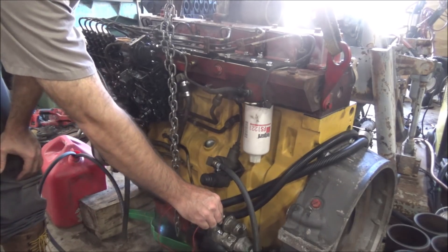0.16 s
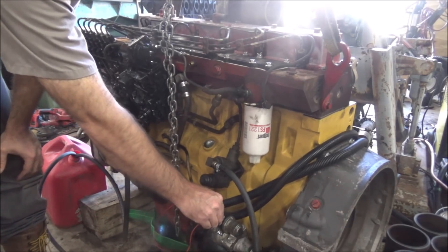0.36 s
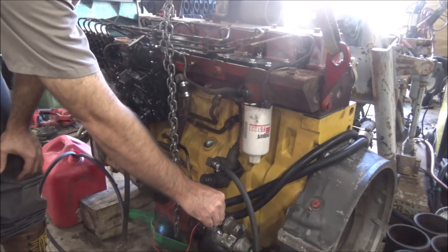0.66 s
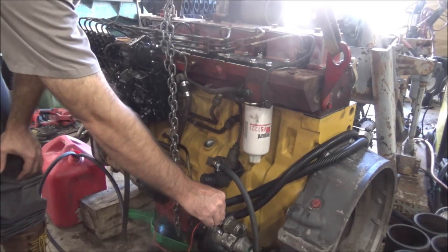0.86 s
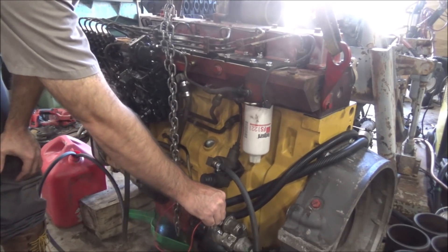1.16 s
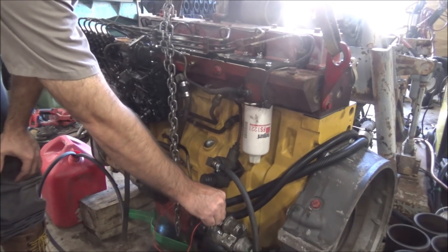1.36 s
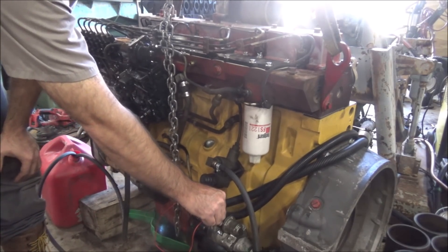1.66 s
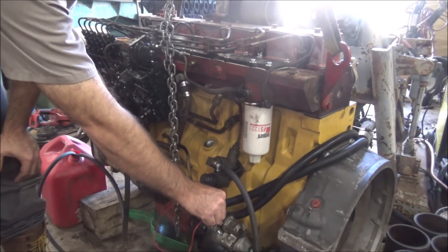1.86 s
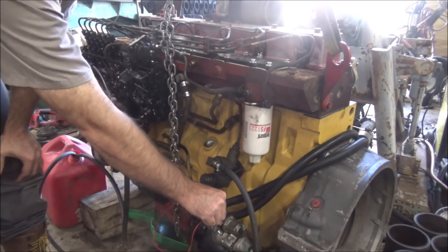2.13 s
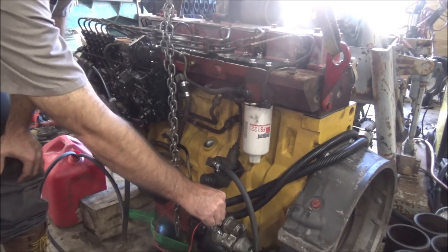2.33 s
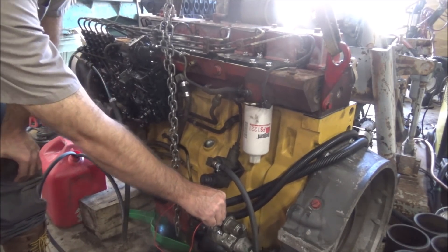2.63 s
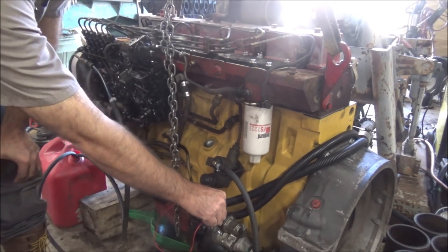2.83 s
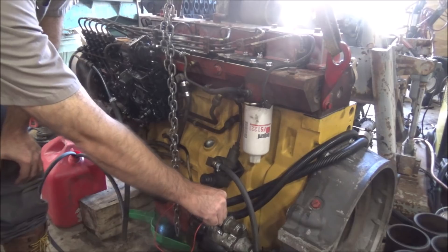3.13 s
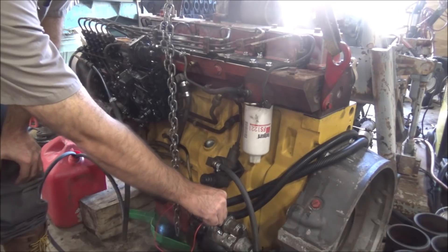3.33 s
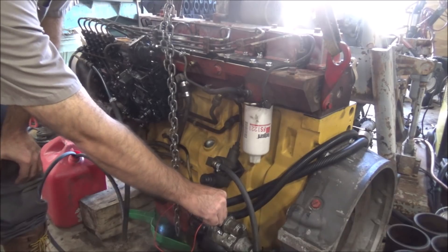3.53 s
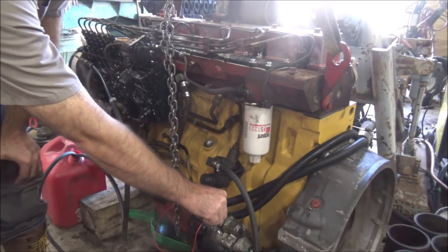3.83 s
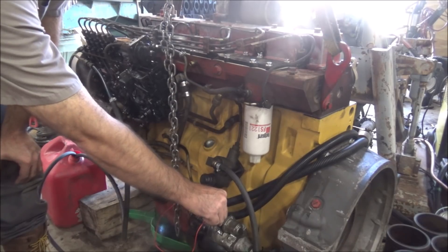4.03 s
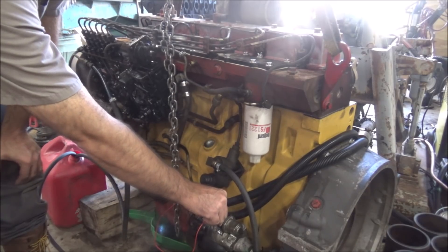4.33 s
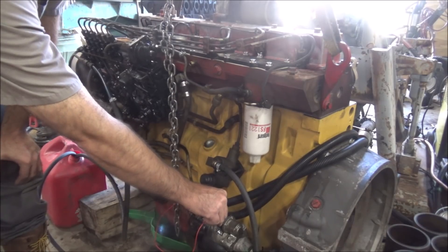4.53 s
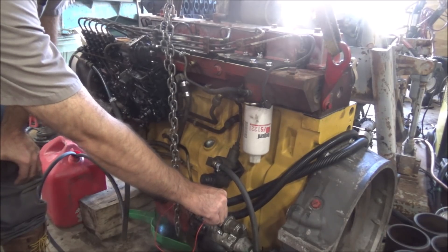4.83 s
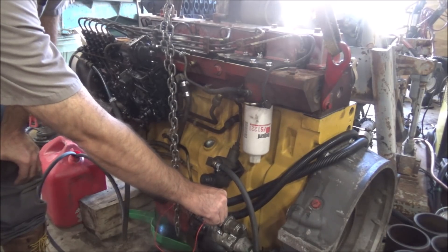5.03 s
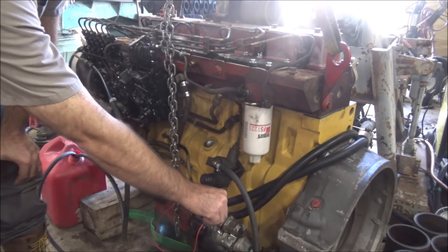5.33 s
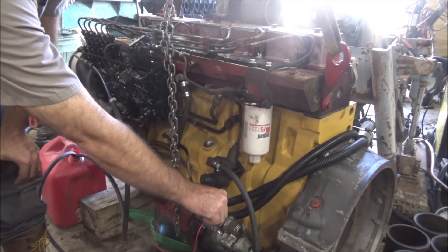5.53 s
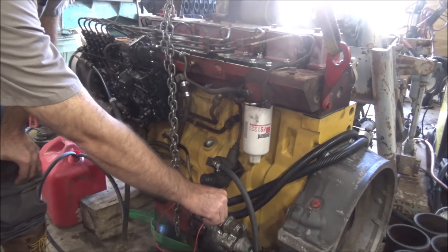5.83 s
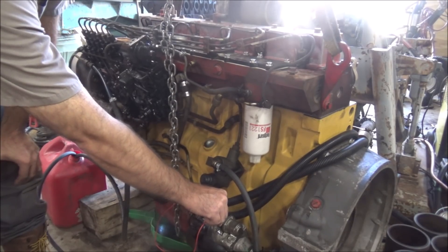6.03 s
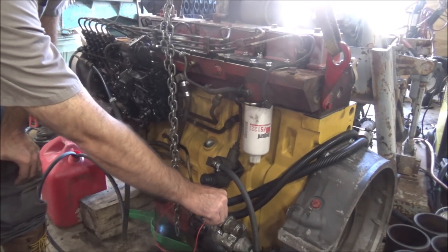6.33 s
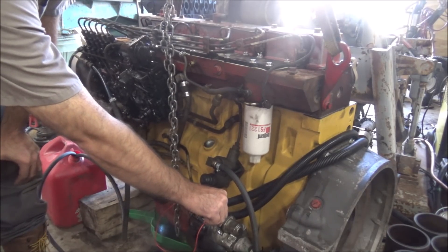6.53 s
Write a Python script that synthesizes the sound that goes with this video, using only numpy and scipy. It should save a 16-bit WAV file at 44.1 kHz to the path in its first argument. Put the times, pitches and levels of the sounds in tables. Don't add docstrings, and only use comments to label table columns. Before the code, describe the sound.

Close by in a reverberant metal-filled workshop, an electric starter engages with a snap and toothy clank, then drags a six-cylinder diesel around. The first strokes stumble, groaning and squeaking; afterwards rapid, regular double clacks and airy chuffs continue to the end. Gear grind and narrow ringing tones swell and slacken with every compression, while loose parts knock. The sound is nearly mono, and the engine does not start.

```python
import sys
import numpy as np
from scipy import signal
from scipy.fft import rfft, irfft, next_fast_len
from scipy.io import wavfile
from scipy.ndimage import uniform_filter1d, map_coordinates

SR = 44100
rng = np.random.default_rng(int(sys.argv[2]) if len(sys.argv) > 2 else 0)


def invert_db(x):
    u = np.asarray(x, float) / 20
    return 10 ** u


def master_out(mix):
    frames = np.transpose(np.atleast_2d(mix))
    ceiling = np.clip(frames, -1, 1)
    pcm = np.round(ceiling * 32767).astype(np.int16)
    wavfile.write(sys.argv[1], SR, pcm)


N = 294588
T = np.arange(N) / SR

# pitch_hz, level_db
HUM = [(116, -34.5), (232, -40), (352, -45), (545, -59), (950, -53)]
# freq_hz, density_db
SHOP_NOISE = [(150, -10), (400, -13), (1000, -8), (2000, -13), (5000, -20), (15000, -25)]
# time_s, gain_db
DUCK = [
    (0, -9.5),
    (.034, -8),
    (.036, -24),
    (.065, -16),
    (.1, -21.5),
    (.5, -31),
    (6.68, -39),
]
# time_s, half_length_s, level_db
LURCH = [
    (0.043, 0.049, -50),
    (0.247, 0.067, -55),
    (0.51, 0.1, -50),
    (1.2, .05, -52),
]
# freq_hz, t60_s
ROOM = [(200, 0.76), (2000, 0.98), (10000, 0.33)]

# time_s, pitch_hz, level_db, octave_db
GROAN = [
    (.315, 345, -42, -33),
    (.345, 342, -35, -25),
    (.37, 300, -35, -28),
    (.4, 262, -40, -29),
    (.435, 262, -39, -30),
    (.45, 270, -38, -39),
    (.49, 278, -46, -46),
]
# time_s, half_length_s, level_db
SQUEAKS = [(0.306, 0.028, -32), (0.347, .012, -38), (0.453, .025, -31.5), (0.567, 0.037, -31.5),
           (0.682, 0.034, -41), (0.767, .02, -39)]
# freq_hz, width_hz, level_db
SEAL = [(7780, 340, 5), (8600, 730, 7.5), (11150, 610, 3.5), (11630, 240, -3)]

# upper_hz, lower_hz
PIPE_HZ = (113.2, 99.4)
# upper_db, lower_db
PIPE = [(-52, -68), (-52, -64), (-52.5, -66), (-52.5, -55), (-54.5, -61), (-52.5, -53.5)]
CASTING_HZ = [751, 839, 1054, 1172, 1469, 1884, 2073, 2730, 2897]
KNOCKS_PER_STROKE, KNOCK_DB, KNOCK_CYCLES, KNOCK_DELAY_S = 7, -33, 15.6, .035

# time_s, snap_db, decay_s, body_db
BLOWS = [
    (0.0646, -18, 0.004, -40),
    (0.075, -23, 0.015, -23.5),
    (0.123, -19.5, 0.0037, -29),
]
# freq_hz, density_db
SNAP = [(500, -22), (1500, -12), (3000, -1), (6500, 6.5), (10000, 8), (15800, -10)]
# pitch_hz, level_db, start_s, end_s
FREE_RING = [(1570, -19.5, .086, .129), (3950, -27, .094, .121), (5300, -35, .085, .115),
             (6800, -40, .09, .112), (7900, -41, .085, .118), (10100, -40, .09, .112),
             (2650, -34, .09, .125), (2720, -35, .255, .29), (2755, -30, .315, .35)]

CYCLE_S = [0.8226, 1.4627, 2.1092, 2.7674, 3.4316, 4.1015, 4.7714, 5.443, 6.119, 6.796]
FIRING = [0, .17, .331, .498, .666, .823]
# time_s, clack_peak_db, second_clack_db, chuff_db, chuff_s
EARLY = [(0.1314, -11.5, 0, -26.5, 0.048), (0.175, -19, -2, -27, 0.098), (0.3585, -16, -5, -25.5, 0.077),
         (0.482, -13, 0, -25, .11), (0.6204, -16, -7, -22.5, 0.038), (0.7146, -11.5, -7, -30, .1)]
# clack_peak_db, second_clack_db, chuff_db, chuff_s, brightness_db
CYLINDERS = [(-13.5, -3.5, -26, .08, 1), (-13.5, -14, -24, 0.045, 0.5), (-14, -2, -24, 0.072, 0.5),
             (-14, -9, -25, 0.066, 3), (-14.5, -4.5, -25.5, 0.051, 2), (-15, -1, -25, 0.084, 1)]
# clack_db, second_clack_db, chuff_db, brightness_db
SCATTER_DB = (1.1, 1.7, .8, 0.84)
# freq_hz, density_db
CHUFF = [(35, -54), (60, -32), (190, -20), (330, -10.5), (490, -15), (760, -5.5), (1050, -10.5),
         (1280, -15), (1550, 0), (2270, -19.5), (2800, -8.5), (4700, -17.5), (11000, -19.5), (15700, -35.5)]
# freq_hz, density_db
CLACK = [(500, -27.5), (1500, -0.5), (3000, 10.5), (6000, 0.5), (10000, -4), (13000, -8.5), (15800, -13)]
# freq_hz, width_hz, level_db
BLOCK = [(108, 27, 4), (325, 22, 6.5), (402, 58, 4.5), (570, 18, 7.5), (742, 10.6, 4.5),
         (821.4, 29.5, 12.5), (1062, 88, 11), (1410, 17, 5), (1920, 86, 8.5), (2030, 44, -2),
         (2290, 18, -20), (2855, 170, 0)]
# freq_hz, width_hz, level_db
ROCKING = [(102, 8, 1), (62, 15, -21), (45, 15, -4)]

# time_s, effort_db, ring_drive_db
STARTER = [(.07, -41, 0), (.12, -28, -5), (.18, -27, -14), (.25, -23.5, -8), (.4, -27.5, -2),
           (.69, -26, 0.5), (.97, -26, -2), (1.3, -26, 3), (1.55, -27, 1), (1.9, -27, -1), (2.7, -27.5, 2),
           (3.2, -27.5, -2.5), (3.65, -26.5, 1), (4.3, -27, -2), (5, -26.5, -3), (5.8, -28.5, -5),
           (6.1, -27.5, -2.5), (6.68, -26, 1)]
# freq_hz, density_db
GRIND = [(35, -59.5), (60, -23), (190, -19), (330, -9), (640, -4), (900, -2.5), (1280, -11.5), (1600, -3),
         (2300, -10), (2800, -10), (3570, -23), (6000, -19.5), (9000, -64.5)]
# freq_hz, density_db
HISS = [(2350, -24.5), (4000, 0), (4670, -10), (6660, -6.5), (8610, -6), (9600, -9), (11100, -4.5),
        (14900, -12), (15700, -21)]
# freq_hz, width_hz, level_db
CASE = [(393, 40, 3), (543, 19, 4), (715, 36, 1.5), (1461, 28, -3.5), (1899, 36, 0), (2079, 35, 2.5),
        (2375, 18, 6.5), (2740, 78, 3.5)]
# pitch_hz, unsteadiness_hz, level_db
RING = [(1561, 15, 0), (1541, 14, -11)]
# pitch_hz, unsteadiness_hz, level_db
HIGH_RING = [(3918, 24, -1.5), (3956, 22, -2.5), (3856, 26, -6), (2604, 18, -1.5), (2627, 16, -3.5),
             (4095, 90, -9)]
# ring_db, high_ring_db, lower_housing_db, upper_housing_db
SINGS = [(-34.5, -44, -35.5, -36.5), (-29.5, -45, -35, -36), (-32.5, -43.5, -33, -42.5),
         (-32.5, -42, -33, -32), (-31, -45, -33.5, -36.5), (-30, -44.5, -35, -31)]
# ring_db, high_ring_db, lower_housing_db, upper_housing_db
FLICKER_DB = (2.9, 3.1, 1.1, 2.6)
HISS_DB, SPIN_UP_DB, SPIN_UP_S = -10, 3.5, 1

# freq_hz, side_db
APART = [(30, -20), (100, -26), (400, -59), (1500, -48), (4000, -30), (9000, -20), (12000, -33)]
# freq_hz, side_over_mid_db
LEAN = [(60, -23.5), (400, -20), (800, -19.5), (1500, -20), (3000, -16), (6000, -19), (12000, -23.5)]
# freq_hz, side_over_mid_db
SIDE_FLOOR = [(60, -23.5), (400, -12.5), (800, -12.5), (1500, -11.5), (3000, -12), (6000, -14),
              (12000, -16.5)]
TOP_HZ = 15830


def unit(x):
    return x / np.sqrt(np.mean(x ** 2) + 1e-20)


def along(points, hz):
    f, v = np.transpose(points)
    return np.interp(np.log(hz + 1), np.log(f + 1), v)


def curves(rows, **ends):
    s, *cols = np.transpose(rows)
    return [np.interp(T, s, c, **ends) for c in cols]


def wobble(rate_hz):
    return map_coordinates(rng.standard_normal(int(N * rate_hz / SR) + 4), [T * rate_hz])


def swells(rows):
    return sum(invert_db(db) * np.exp(-((T - s) / half) ** 2) for s, half, db in rows)


def filtered(x, response):
    m = next_fast_len(N + SR // 2)
    return irfft(rfft(x, m) * response(np.fft.rfftfreq(m, 1 / SR)), m)[..., :N]


def modes(table, f):
    return sum(invert_db(db) * 1j * f * w / (c * c - f * f + 1j * f * w) for c, w, db in table)


def causal(spectrum, f):
    cep = irfft(np.log(invert_db(along(spectrum, f)) + 1e-6))
    half = len(cep) // 2
    cep[1:half] *= 2
    cep[half + 1:] = 0
    return np.exp(rfft(cep))


def body(spectrum, table, depth):
    return lambda f: causal(spectrum, f) * (1 + depth * modes(table, f))


def grit(rate_hz, spread_db, smooth):
    size = invert_db(spread_db * rng.uniform(-1, 1, N))
    hits = (rng.random(N) < rate_hz / SR) * rng.choice([-1, 1], N) * size
    return unit(unit(hits) + smooth * rng.standard_normal(N))


def shaped(drive, envelope, response):
    plain, played = filtered(np.array([drive, drive * envelope]), response)
    return played / np.std(plain)


def singing(table, steady):
    out = 0
    for hz, unsteady_hz, db in table:
        z = wobble(unsteady_hz) + 1j * wobble(unsteady_hz)
        even = z / (np.abs(z) + 0.038) ** steady
        out = out + invert_db(db) * unit(np.real(even * np.exp(2j * np.pi * hz * T)))
    return out


def openings():
    cycles = np.array(CYCLE_S)
    steady = (cycles[:-1, None] + np.diff(cycles)[:, None] * FIRING).ravel()
    s = np.append(np.transpose(EARLY)[0], steady)
    return s, np.arange(len(s)) % len(FIRING)


def load():
    s = openings()[0]
    return np.interp(T, s, np.arange(len(s))) % 1


def sings(part):
    s, cylinder = openings()
    habit_db = np.interp(T, s + .045, np.transpose(SINGS)[part][cylinder])
    chance_db = FLICKER_DB[part] * (0.37 * wobble(9.7) + .9 * wobble(30))
    return habit_db + chance_db + SPIN_UP_DB * np.exp(-T / SPIN_UP_S)


def workshop():
    hum = sum(invert_db(db + 0.95 * wobble(44)) * np.sin(2 * np.pi * hz * T - 1.8) for hz, db in HUM)
    far = invert_db(-39.5) * unit(filtered(rng.standard_normal(N), lambda f: invert_db(along(SHOP_NOISE, f))))
    low_noise = unit(filtered(rng.standard_normal(N), lambda f: modes([(55, 90, 0)], f) ** 2))
    return invert_db(curves(DUCK)[0]) * (np.sqrt(2) * hum + far) + swells(LURCH) * low_noise


def room(x):
    hz, t, z = signal.stft(rng.standard_normal((2, SR // 2)), SR, nperseg=256)
    tail = signal.istft(z * invert_db(-60 * t / along(ROOM, hz)[:, None]), SR, nperseg=256)[1]
    late = np.pad(x, (300, 0))[None]
    return signal.fftconvolve(late, tail / np.linalg.norm(tail[0]), axes=1)[:, :N]


def groan():
    hz, low_db, octave_db = curves(GROAN)
    turn = 2 * np.pi * np.cumsum(hz * (1 + 0.014 * wobble(90.2))) / SR
    gate = np.clip(np.minimum(T - GROAN[0][0], GROAN[-1][0] - T) / 0.013, 0, 1)
    tone = invert_db(low_db + 1.9 * wobble(64)) * np.sin(turn)
    tone += invert_db(octave_db) * np.sin(2 * turn) + invert_db(octave_db - 9.5) * np.sin(3 * turn)
    return np.sqrt(2) * gate * tone


def squeaks():
    rub = swells(SQUEAKS)
    rub += (T > .8) * invert_db(-40.5 + 1.6 * wobble(11)) * np.sin(np.pi * load()) ** 2
    return shaped(grit(1100, 1.7, smooth=0.56), rub, lambda f: modes(SEAL, f) ** 2)


def manifold():
    s, cylinder = openings()
    stroke = np.clip(np.searchsorted(s, T) - 1, 0, None)
    upper_db, lower_db = np.transpose(PIPE)[:, cylinder[stroke]]
    turn = 2 * np.pi * (T - s[stroke])
    throb = invert_db(upper_db) * np.sin(PIPE_HZ[0] * turn) + invert_db(lower_db) * np.sin(PIPE_HZ[1] * turn)
    return np.sqrt(2) * invert_db(2.2 * wobble(9)) * np.abs(np.sin(np.pi * load())) ** 0.77 * throb


def knocks():
    s = np.repeat(openings()[0], KNOCKS_PER_STROKE)
    late, pick, size, detune = np.transpose(rng.random((len(s), 4)))
    mode_hz = np.array(CASTING_HZ)[(pick * len(CASTING_HZ)).astype(int)]
    hz = (mode_hz * (1 + .03 * (detune - .5)))[:, None]
    t = np.arange(SR // 25) / SR
    ring = np.sin(2 * np.pi * hz * t) * np.exp(-t * hz / KNOCK_CYCLES) * (1 - np.exp(-t / 0.0011))
    ring = invert_db(KNOCK_DB + 12.1 * size)[:, None] * ring
    start = np.round((s - KNOCK_DELAY_S * np.log(late + .05)) * SR).astype(int)
    at = start[:, None] + np.arange(len(t))
    return np.bincount(at.ravel(), ring.ravel(), N)[:N]


def housing():
    slack = load() ** 1.5 * np.clip((T - .7) / .8, 0, 1)
    begun = np.clip((T - .12) / .05, 0, 1)
    lower_db = sings(part=2) - 7 * np.exp(-T / 1.5) - 5 * slack ** 2
    upper_db = sings(part=3) - 19.5 * slack
    lower = invert_db(lower_db) * singing([(734.5, 11, 0)], steady=.7)
    upper = invert_db(upper_db) * singing([(843.6, 28, 0)], steady=0.36)
    return begun * (lower + upper)


def engagement():
    after = lambda s, decay_s: (T > s) * np.exp(-np.abs(T - s) / decay_s)
    snap = sum(invert_db(db) * after(s, decay_s) for s, db, decay_s, _ in BLOWS)
    thud = sum(invert_db(body_db) * after(s, 0.023) for s, _, _, body_db in BLOWS)
    out = shaped(rng.standard_normal(N), snap, lambda f: causal(SNAP, f))
    out += shaped(rng.standard_normal(N), thud, body(CHUFF, BLOCK, depth=0.41))
    for hz, db, begin, end in FREE_RING:
        held = np.clip(np.minimum(T - begin, end - T) / .005, 0, 1)
        level = np.sqrt(2) * held * invert_db(db + 1.2 * wobble(170))
        out += level * np.sin(2 * np.pi * (hz * T + .1 * wobble(80)))
    return out


def stroke_rows(luck):
    s, cylinder = openings()
    clack, second, air, tilt = np.transpose(luck * SCATTER_DB)
    rows = np.array(CYLINDERS)[cylinder] + np.transpose([clack, second, air, 0 * air, tilt])
    rows[:len(EARLY)] = np.pad(np.array(EARLY)[:, 1:], ((0, 0), (0, 1)))
    return np.column_stack([s, rows])


def strokes():
    dull, bright, chuff = np.zeros((3, N + SR))
    t = np.arange(SR // 5) / SR
    lead = .006

    def blow(lag, decay):
        return (1 - np.exp(-np.clip(t - lag, 0, 1) / .0011)) * np.exp(-np.abs(t - lag) / decay)

    chance = rng.standard_normal((len(openings()[0]), 8))
    leak = (t < lead) * (t / lead) ** 2
    front = 1 - np.exp(-np.clip(t - lead - .001, 0, 1) / .003)
    puffs = 1 + .5 * blow(lead, 0.002) + 0.46 * blow(.0255, 0.018)
    for (s, db, second_db, air_db, length_s, tilt_db), luck in zip(stroke_rows(chance[:, 4:]), chance):
        at = min(round((s - lead) * SR), N)
        decay = .0038 * np.exp(.25 * luck[3])
        clack = invert_db(-5) * leak + invert_db(-9) * blow(lead, 0.008)
        clack += (1 - 0.55 * blow(lead, 0.0012)) * blow(lead, decay) * 1.68
        clack += invert_db(second_db) * blow(.0255 + .0012 * luck[0], decay)
        clack += invert_db(-10 + 3 * luck[1]) * blow(.044 + .002 * luck[2], .004)
        dull[at:][:len(t)] += invert_db(db - 12 - tilt_db) * clack
        bright[at:][:len(t)] += invert_db(db - 14 + tilt_db) * clack
        chuff[at:][:len(t)] += invert_db(air_db) * front * puffs * np.exp(-(t / length_s) ** 2.6)
    dull, bright, chuff = dull[:N], bright[:N], chuff[:N]

    lumps = invert_db(0.56 * wobble(70))
    air = shaped(grit(1500, 2.1, smooth=0.94), lumps * chuff, body(CHUFF, BLOCK, depth=1.73))
    rock = invert_db(-37) * shaped(rng.standard_normal(N), chuff, lambda f: modes(ROCKING, f))
    low = shaped(grit(5000, 4, smooth=1.3), dull * invert_db(2.5 * wobble(300)),
                 lambda f: causal(CLACK, f) / (1 + (f / 7000) ** 4))
    high = shaped(grit(5000, 4, smooth=1.3), bright * invert_db(1.5 * wobble(250)),
                  lambda f: causal(CLACK, f) / (1 + (7000 / (f + 1)) ** 4))
    return air + rock + low + high


def starter():
    effort_db, drive_db = curves(STARTER, left=-120)
    start = np.clip((T - .07) / .022, 0, 1)
    slack = load() ** 2.2 * np.clip((T - .5) / .9, 0, 1)
    grind_db = effort_db + 1 + 1.2 * wobble(30) - 9.3 * slack
    hiss_db = effort_db + HISS_DB + SPIN_UP_DB * np.exp(-T / SPIN_UP_S)
    hiss_db += 2.84 * wobble(45) - 2.8 * slack + 3.6 * slack ** 6
    ring_db = sings(part=0) + drive_db + 2.3 - 5.5 * slack
    high_db = sings(part=1) + 1 - 4 * slack
    out = shaped(grit(2500, 4, smooth=1.2), invert_db(grind_db), body(GRIND, CASE, depth=0.85))
    out += shaped(grit(1500, 6, smooth=1.2), invert_db(hiss_db), lambda f: causal(HISS, f))
    out += invert_db(ring_db) * singing(RING, steady=.68)
    out += invert_db(high_db) * singing(HIGH_RING, steady=.4)
    return start * out


def scene():
    engine = groan() + squeaks() + manifold() + knocks() + housing() + engagement() + strokes() + starter()
    wet, other = room(engine)
    mid = engine + invert_db(-15.0) * wet + workshop()
    side = filtered(other, lambda f: invert_db(along(APART, f))) - filtered(mid, lambda f: invert_db(along(LEAN, f)))
    return np.array([mid + side, mid - side])


def band_limit(x):
    return signal.sosfilt(signal.butter(12, 16510, fs=SR, output="sos"), x)


def record(dry):
    soft = dry / (1 + np.abs(dry / .36) ** 4) ** (1 / 4)
    mid_side = np.array([soft[0] + soft[1], soft[0] - soft[1]]) / 2
    mid, side = filtered(mid_side, lambda f: f < TOP_HZ)
    hz, _, (m, s) = signal.stft(np.array([mid, side]), SR, nperseg=2048)
    level = uniform_filter1d(uniform_filter1d(np.abs(m), size=40, axis=0), size=9, axis=1)
    strong = np.abs(s) > level * invert_db(along(SIDE_FLOOR, hz))[:, None]
    side = signal.istft(s * strong, SR, nperseg=2048)[1][:N]
    return band_limit(np.array([mid + side, mid - side]))


dry = scene()
out = record(dry)
master_out(out)
```